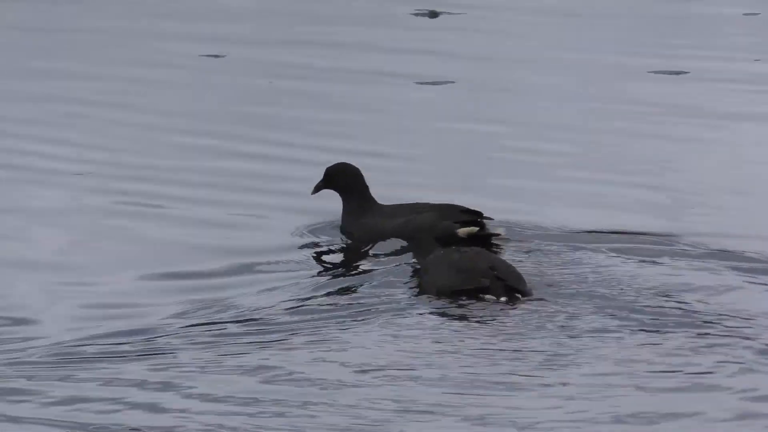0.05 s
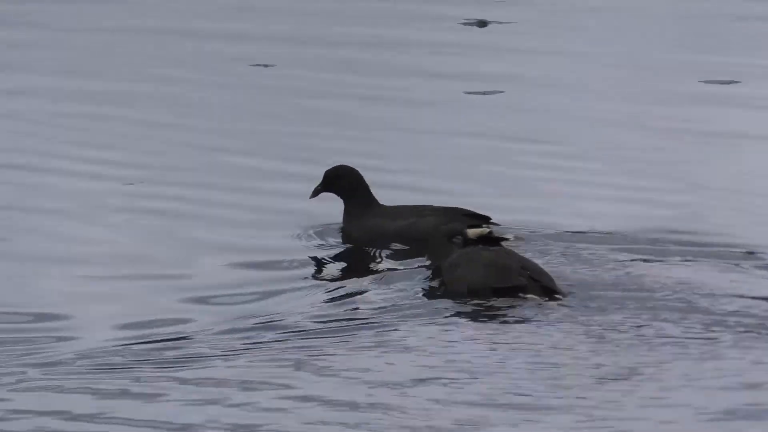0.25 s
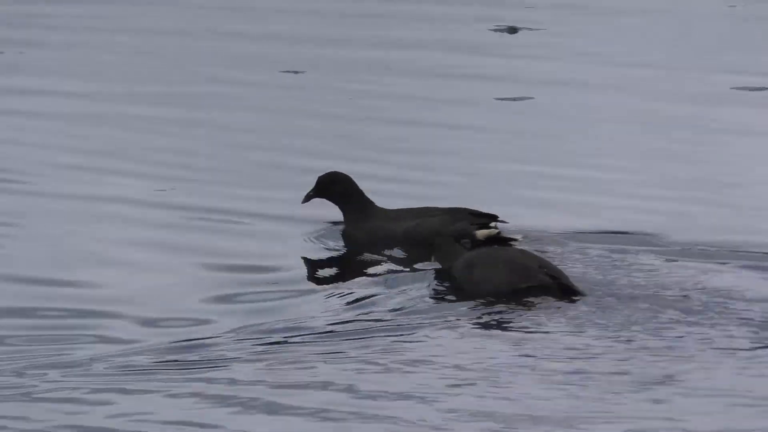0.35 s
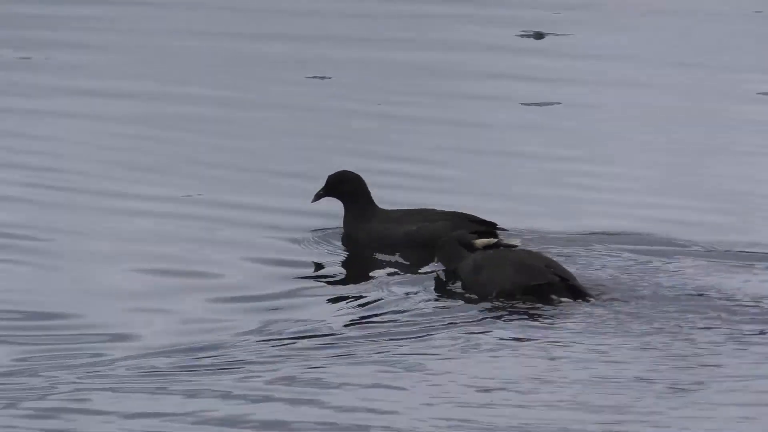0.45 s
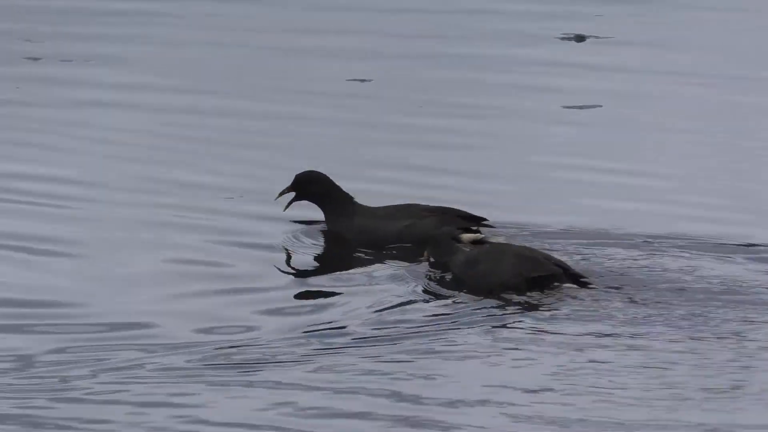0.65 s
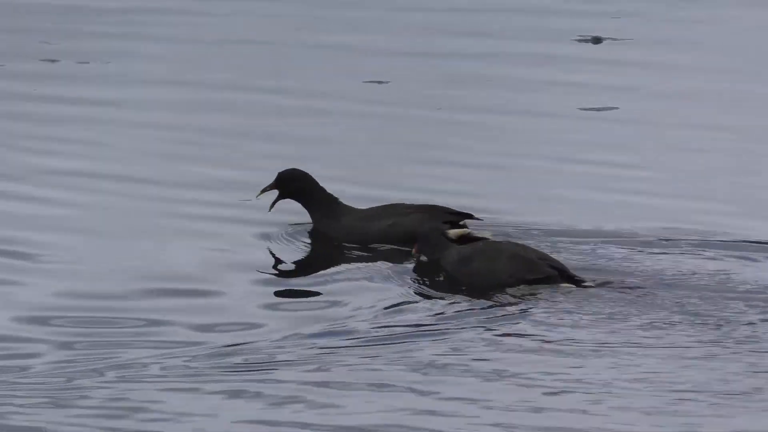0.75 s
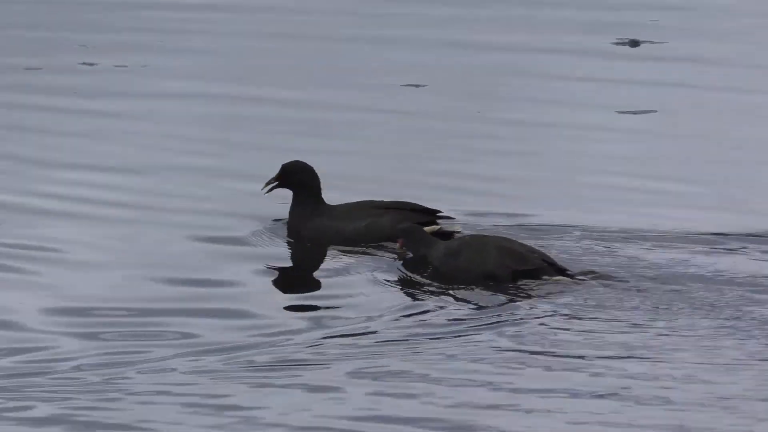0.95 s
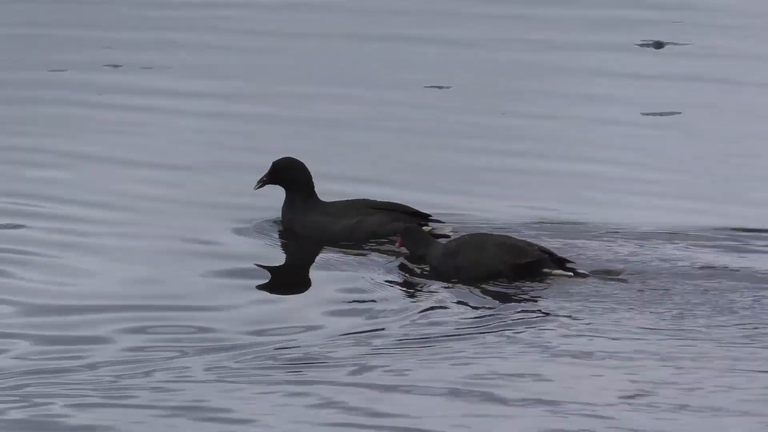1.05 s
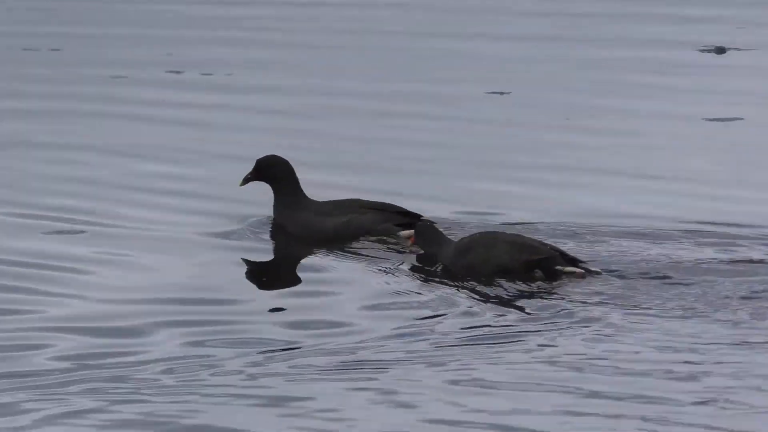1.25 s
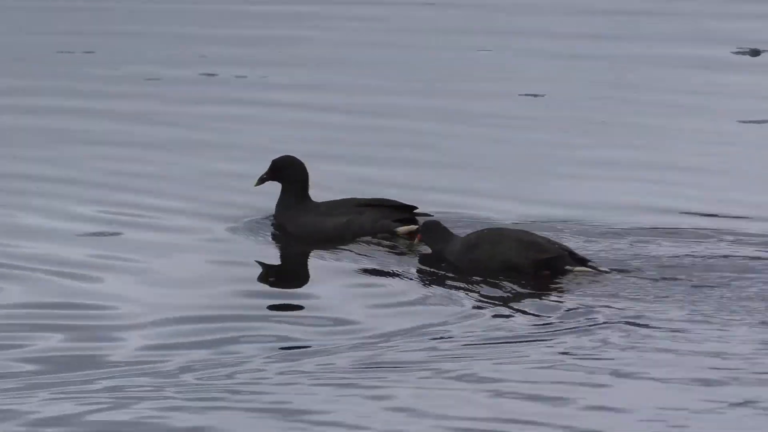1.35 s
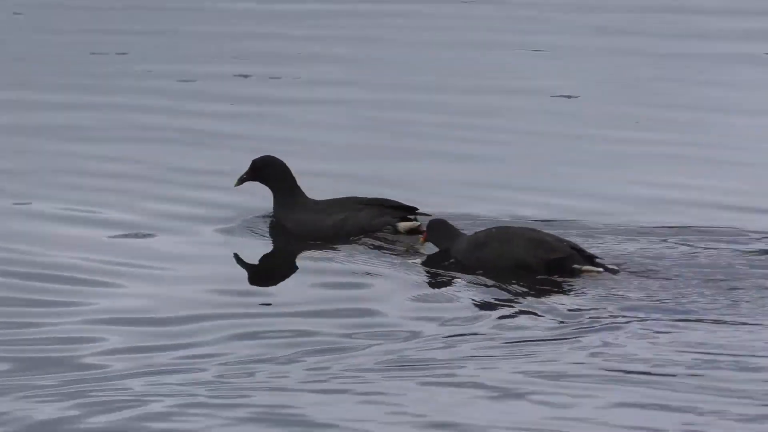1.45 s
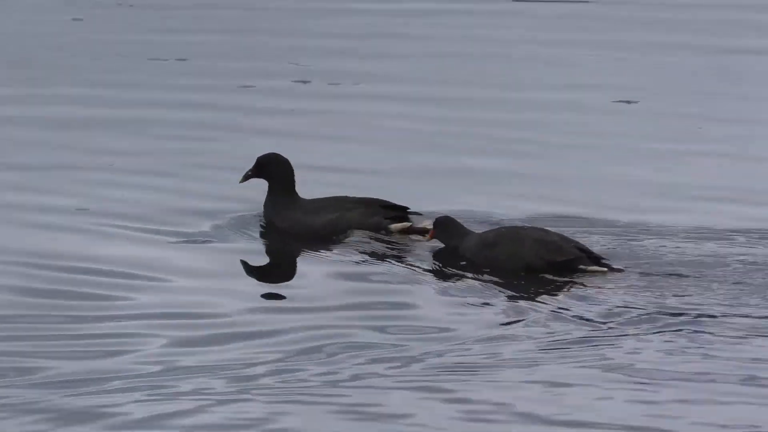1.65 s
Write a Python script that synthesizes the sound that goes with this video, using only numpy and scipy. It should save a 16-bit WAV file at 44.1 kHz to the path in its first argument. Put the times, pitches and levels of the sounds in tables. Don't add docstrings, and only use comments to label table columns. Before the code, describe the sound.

On an open pond, a small bird whistles thinly and a drop plops, then a nearby water bird gives one clipped, ringing honk with a faint tail; distant birds, soft rumble and hiss continue on a camera microphone.

```python
import sys
import numpy as np
from scipy import signal
from scipy.fft import rfft, irfft
from scipy.io import wavfile
from scipy.ndimage import uniform_filter1d

SR = 44100
rng = np.random.default_rng(int(sys.argv[2]) if len(sys.argv) > 2 else 0)


def volts_from_db(level):
    exponent = np.asarray(level, float) / 20
    return 10 ** exponent


def unload_audio(sound):
    columns = np.transpose(np.atleast_2d(sound))
    steps = np.round(np.clip(columns, -1, 1) * 32767)
    wavfile.write(sys.argv[1], SR, steps.astype(np.int16))


N = 74970
T = np.arange(N) / SR

# [t/s, gust level/dB, chorus level/dB]
WEATHER = [(0, -1, -0.5), (.25, -1.5, -1), (.5, -0.5, -1.5), (.75, -1, -1), (.9, 0.5, -1), (1.1, 0.5, 2),
           (1.28, 0.5, -1), (1.32, 6, 0.5), (1.37, 3, -0.5), (1.41, -0.5, -0.5), (1.7, -1, -3)]


def walk(rate):
    hold = int(SR / rate)
    steps = np.repeat(rng.standard_normal(N // hold + 1), hold)
    return 1.3 * uniform_filter1d(uniform_filter1d(steps, hold), hold)[:N]


def pan(x, db):
    return x * volts_from_db(np.array([[db / 2], [-db / 2]]))


def wet(x, t60, start):
    t = T[:int(SR * t60)]
    tail = rng.standard_normal((2, N))[:, :len(t)]
    tail = tail * volts_from_db(-60 * t / t60) * np.clip(t / start, 0, 1) ** 3
    tail = tail / np.sqrt(np.sum(tail ** 2) / 2)
    return signal.fftconvolve(x[None], tail, axes=1)[:, :N]


def bands(table, db, flicker_db, rate, swell_db):
    # [f/Hz, level/dB]
    side = np.array([(30, -2), (60, -10.5), (125, -13.5), (500, -10), (2000, -5.5), (4600, -3), (6000, -8),
                     (9000, -6.5), (14000, -2)])
    table = np.array(table)
    f = np.arange(N // 2 + 1) * SR / N + 1
    colour_db = np.interp(np.log(f), np.log(table[:, 0]), table[:, 1], left=-90, right=-90)
    noise = rfft(rng.standard_normal((2, N))) * volts_from_db(colour_db)
    noise[1] *= volts_from_db(np.interp(np.log(f), np.log(side[:, 0]), side[:, 1]))
    out = 0
    for octave in np.arange(4, 14.4, 1 / 3):
        flicker = volts_from_db(flicker_db * walk(rate))
        share = np.clip(1 - 3 * np.abs(np.log2(f) - octave), 0, 1)
        out = out + irfft(noise * share, N) * flicker
    mid, side_noise = out * volts_from_db(db + swell_db) / np.std(out[0])
    return np.array([mid + side_noise, mid - side_noise])


def notes(table, partials, flutter, wobble, edge_s, rate, fade_db=0):
    out = 0
    for start, length, hz0, hz1, db in table:
        u = T - start
        edge = np.clip(np.minimum(u, length - u) / edge_s + .5, 0, 1)
        env = np.sin(np.pi / 2 * edge) ** 2
        env = env * volts_from_db(fade_db * np.clip(2 * u / length - 1, 0, 1))
        glide = hz0 + (hz1 - hz0) * np.clip(u / length, 0, 1)
        phase = 2 * np.pi * np.cumsum(glide * (1 + wobble * walk(59.6))) / SR
        for k, rel_db in partials:
            beads = (1 + flutter * walk(rate)) / np.sqrt(1 + flutter ** 2)
            out = out + np.sqrt(2) * env * beads * volts_from_db(db + rel_db) * np.sin(k * phase)
    return out


def wind_and_traffic():
    # [f/Hz, level per Hz/dB]
    rumble = [(13, 5), (22, -29), (43, -7.5), (101, 0.5), (356, -7.5), (384, -11.5), (521, -15),
              (554, -16.5), (850, -24), (1100, -115), (1870, -120)]
    s, gust, _ = np.array(WEATHER).T
    return bands(rumble, -52, 1.46, 11.9, np.interp(T, s, gust))


def far_chorus():
    # [f/Hz, level per Hz/dB]
    chorus = [(500, -33.5), (850, -7.5), (1570, -5), (1710, -7), (2360, -11), (3020, -14.5), (3320, -11.5),
              (4360, -23.5), (6500, -29.5), (8450, -45), (14300, -120)]
    s, _, strength = np.array(WEATHER).T
    return pan(bands(chorus, -56, 1.86, 20.11, np.interp(T, s, strength)), 0.84)


def hums():
    # [f/Hz, level/dB]
    tones = [(100, -72.5), (200, -66), (391, -70.5), (515, -72)]
    out = 0
    for hz, db in tones:
        level = volts_from_db(db + 1.77 * walk(14.8))
        phase = 2 * np.pi * np.cumsum(hz * (1 + 0.009 * walk(7.97))) / SR
        out = out + np.sqrt(2) * level * np.sin(phase)
    return out


def microphone_hiss():
    # [f/Hz, level per Hz/dB]
    hiss = [(3530, -17), (6000, -9), (7550, -4.5), (11400, -.5), (14400, -2), (15700, -1)]
    return bands(hiss, -70.5, 0.16, 9, 0)


def far_birds():
    # [t/s, length/s, from f/Hz, to f/Hz, level/dB]
    far_notes = [(0, 0.06, 7600, 7520, -77), (0, 0.068, 5770, 5760, -73.5), (.015, 0.039, 2830, 2690, -63),
                 (.19, 0.031, 3800, 3800, -66.5), (.225, 0.031, 3760, 3890, -63.5),
                 (.46, 0.027, 3700, 3720, -68), (.51, 0.22, 1392, 1410, -66.5),
                 (.625, 0.014, 1260, 1090, -59), (.66, 0.011, 1185, 1180, -60),
                 (.787, .018, 3760, 3800, -65.5), (.81, .016, 1110, 1110, -59), (.79, .11, 1099, 1131, -62),
                 (.964, .028, 1800, 1900, -64), (.976, .014, 2700, 2720, -62),
                 (.944, 0.018, 1730, 1626, -57.5), (1.03, 0.034, 1150, 1120, -59.5),
                 (1.09, 0.029, 1608, 1590, -59), (1.2, .2, 1580, 1575, -65),
                 (1.185, 0.032, 5060, 5000, -70), (1.33, 0.016, 4800, 4830, -74),
                 (1.4, 0.068, 4750, 4800, -79), (1.42, 0.23, 3366, 3330, -73),
                 (1.57, 0.012, 4560, 4550, -66)]
    # [t/s, length/s, from f/Hz, to f/Hz, level/dB]
    chirps = [
        (.083, .021, 3950, 5600, -63),
        (.101, .013, 4180, 4500, -62.5),
        (1.02, .0194, 4600, 5550, -67),
        (1.556, .019, 4450, 6150, -68.5),
    ]
    # [t/s, length/s, from f/Hz, to f/Hz, level/dB]
    lead_in = [
        (.779, .011, 2000, 2130, -58),
        (.79, .037, 1830, 1855, -54),
        (.8, .028, 1500, 1520, -60),
        (.83, .028, 1535, 1640, -52),
    ]
    pure = [(1, 0)]
    far = notes(far_notes, pure, .35, .004, .01, 170)
    far = far + notes(lead_in, pure, .2, .005, .008, 250)
    far = far + notes(chirps, pure, .6, .025, .012, 600, fade_db=-5)
    return pan(far, 5.5) + volts_from_db(-7.5) * wet(far, 0.19, 0.036)


def plops():
    # [t/s, ring f/Hz, t60/s, level/dB]
    rings = [
        (.134, 7420, 0.008, -50),
        (.494, 329, 0.033, -35.5),
        (.492, 710, 0.008, -38),
        (.492, 7000, 0.0069, -49),
        (.498, 1690, 0.059, -52),
        (.498, 8400, 0.0054, -50),
        (1.185, 1166, 0.03, -50),
        (1.1855, 1135, 0.017, -37.5),
        (.059, 7600, .012, -56),
    ]
    out = 0
    for start, hz, t60, db in rings:
        u = np.clip(T - start, 0, None)
        attack = np.clip(u / 0.00048, 0, 1)
        out = out + volts_from_db(db - 60 * u / t60) * attack * np.sin(2 * np.pi * hz * u)
    return pan(out, 0.62)


def whistler():
    # [t/s, length/s, from f/Hz, to f/Hz, level/dB]
    whistles = [
        (.13, .025, 4830, 5000, -67),
        (.152, .103, 5175, 5200, -61.5),
        (.259, .024, 5190, 5175, -57.5),
        (.498, .019, 5365, 5330, -59),
        (.524, .022, 5290, 5330, -62),
        (.548, .044, 5270, 5090, -57.5),
        (.59, .015, 5050, 4935, -66),
        (.787, .024, 5165, 5055, -65),
    ]
    # [t/s, length/s, from f/Hz, to f/Hz, level/dB]
    beaded = [(.281, .056, 5165, 5200, -67.5), (.335, .022, 5190, 5200, -63), (.348, .014, 4880, 4960, -68),
              (.356, .05, 5130, 5190, -67), (.405, .045, 5190, 5190, -71), (.462, .031, 5440, 5390, -58),
              (.45, .04, 5225, 5150, -63.5), (.606, .04, 5300, 5335, -63), (.61, .11, 5080, 5150, -70),
              (.652, .018, 5255, 5220, -66), (.673, .022, 5360, 5420, -63), (.702, .03, 5340, 5300, -64),
              (.741, .024, 5320, 5280, -68), (.72, .1, 5250, 5300, -76)]
    partials = [(.5, -3.5), (1, 0), (1.5, -21)]
    near = notes(whistles, partials, .4, .003, .009, 200)
    near = near + notes(beaded, partials, .35, .004, .007, 250)
    return pan(near, 3.5) + volts_from_db(-8.5) * wet(near, 0.28, 0.018)


def reeds():
    # [f/Hz, level per Hz/dB]
    colour = [(2500, -16), (4300, 0.5), (6000, -5), (7500, -11.5), (9000, -28)]
    # [t/s, level/dB]
    swell = [
        (.6, -79),
        (.78, -67),
        (.86, -66),
        (.97, -68.5),
        (1.07, -72),
        (1.15, -98),
        (1.25, -95),
    ]
    return bands(colour, 0, 1.5, 60, np.interp(T, *np.array(swell).T))


def honk():
    # [t/s, f/Hz, level/dB]
    call = [
        (.843, 1700, -58),
        (.853, 1758, -43.5),
        (.862, 1815, -41),
        (.872, 1858, -36.2),
        (.887, 1874, -33.9),
        (.898, 1843, -36),
        (.911, 1835, -39),
        (.921, 1802, -43.3),
        (.934, 1785, -48),
    ]
    # [multiple, level at full effort/dB, extra loss per dB less effort/dB, pan/dB]
    overtones = [(2, -3.3, .3, -3), (3, -15.5, 0, 1), (4, -31, 0, 0), (5, -26.5, 1, 1), (6, -39, 2.2, 0)]
    # [delay/s, level/dB, pan/dB]
    echoes = [
        (.1, -26, 2),
        (.165, -32, 0),
        (.245, -29, 1),
    ]
    full_db, shimmer_db = -35, .5
    opens_s, shuts_s, bill_move_s = .8705, .916, .004
    shut_db, ajar_db = -17, -6.5

    s, hz, db = np.array(call).T
    release = 2200 * np.clip(T - s[-1], 0, 1)
    effort = uniform_filter1d(np.interp(T, s, db, left=-90) - release, size=160)
    effort = effort + shimmer_db * walk(150)
    pitch = uniform_filter1d(np.interp(T, s, hz), size=220) * (1 + .001 * walk(198))
    phase = 2 * np.pi * np.cumsum(pitch) / SR
    bill = shut_db * np.clip((opens_s - T) / bill_move_s + .5, 0, 1)
    bill = bill + ajar_db * np.clip((T - shuts_s) / bill_move_s + .5, 0, 1)

    tone = pan(volts_from_db(effort) * np.cos(phase), 2)
    for k, rel_db, slope, pan_db in overtones:
        level = effort + rel_db + slope * (effort - full_db) + bill
        level = level + shimmer_db * (k - 1) * walk(270)
        tone = tone + pan(volts_from_db(level) * np.cos(k * phase + (k - 1) * np.pi / 4), pan_db)
    tone = np.sqrt(2) * tone

    out = tone + volts_from_db(-18) * wet(tone.mean(axis=0), 1.4, .09)
    for delay, echo_db, pan_db in echoes:
        echo = np.roll(tone, int(delay * SR), axis=1)
        out = out + pan(echo * volts_from_db(echo_db + walk(79.7)), pan_db)
    return out


def scene():
    air = wind_and_traffic() + far_chorus() + hums() + microphone_hiss() + reeds()
    return air + far_birds() + plops() + whistler() + honk()


def low_pass(x):
    return signal.sosfilt(signal.butter(12, 15720, fs=SR, output="sos"), x)


def record(dry):
    return low_pass(dry)


dry = scene()
out = record(dry)
unload_audio(out)
```